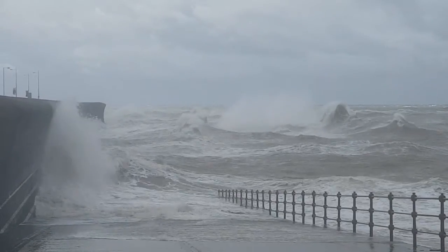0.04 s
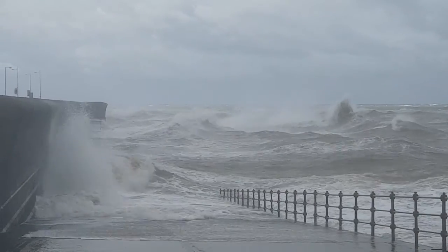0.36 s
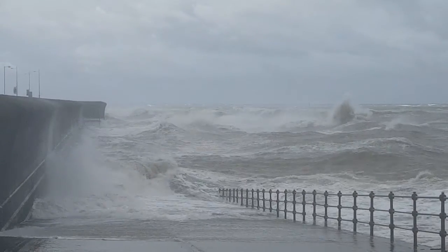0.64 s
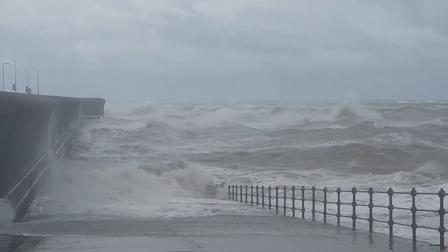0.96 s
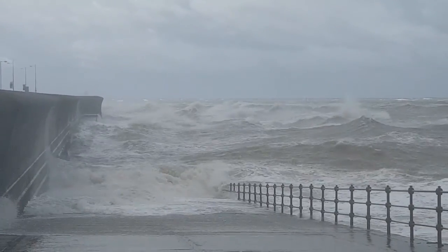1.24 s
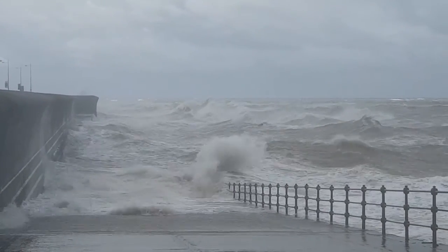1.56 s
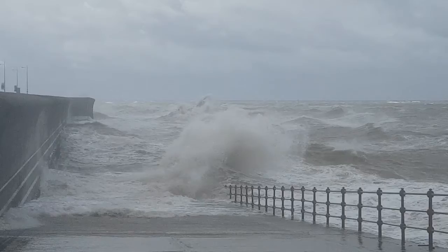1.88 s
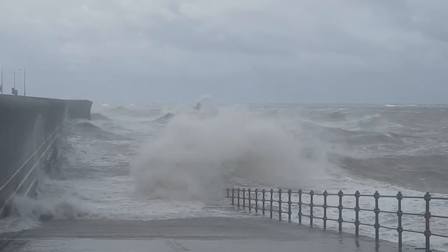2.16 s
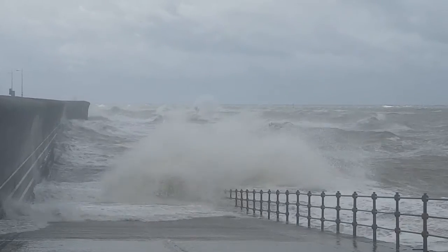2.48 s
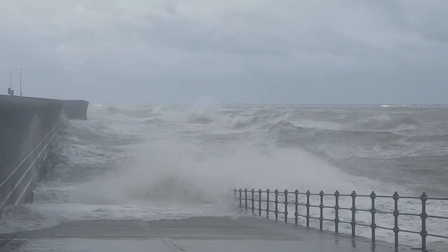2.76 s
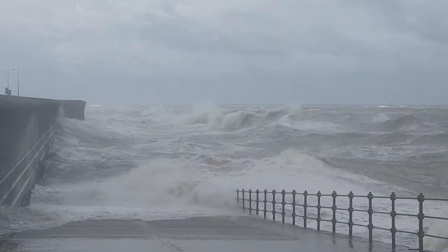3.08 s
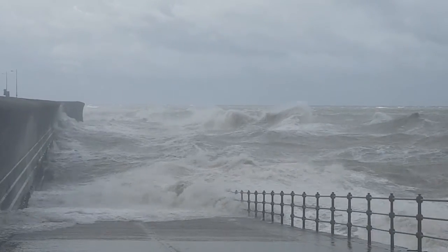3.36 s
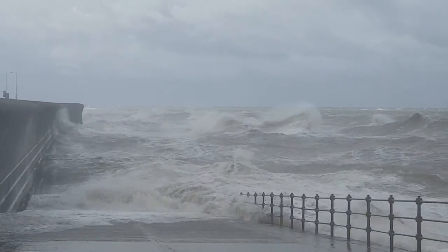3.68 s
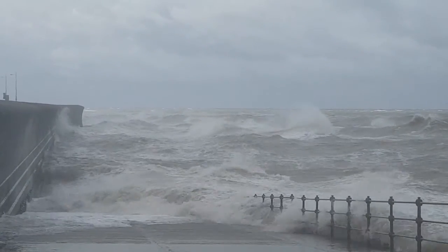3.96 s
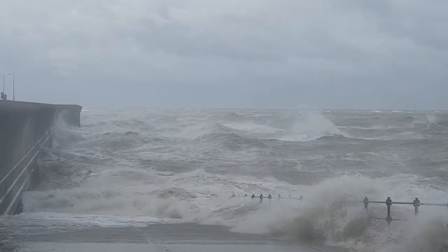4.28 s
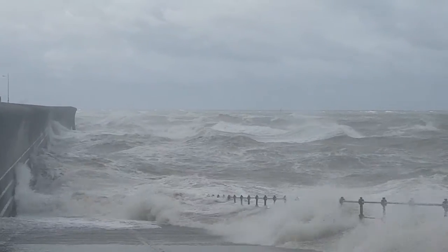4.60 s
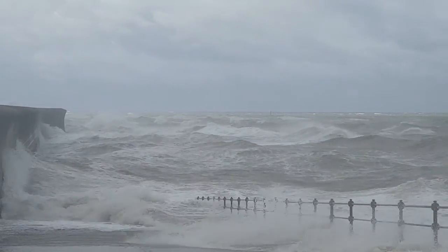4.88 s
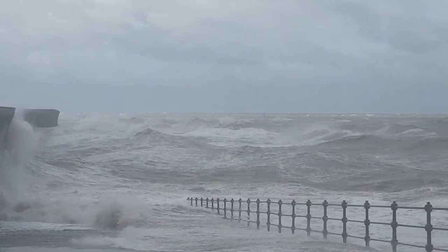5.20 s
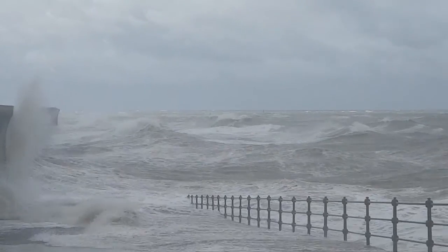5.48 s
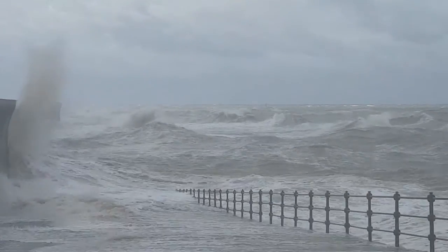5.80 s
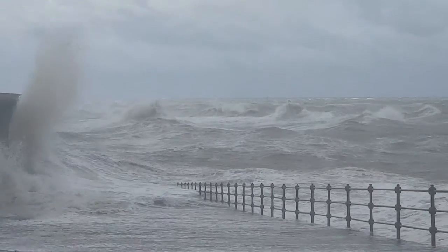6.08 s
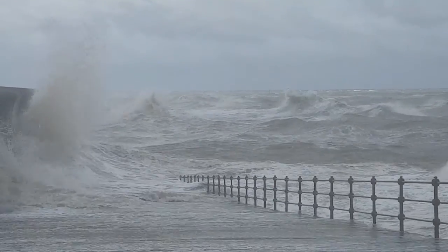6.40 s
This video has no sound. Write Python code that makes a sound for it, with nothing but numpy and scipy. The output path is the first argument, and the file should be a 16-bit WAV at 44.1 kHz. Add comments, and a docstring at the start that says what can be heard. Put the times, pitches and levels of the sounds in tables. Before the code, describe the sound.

Strong wind buffets a hand-held stereo microphone throughout, a low rumble with fluttering gusts that shift between the sides. Behind it, storm surf roars against a sea wall, fizzier on the left and slightly hollow on the right. From about 0.6 to 1.4 seconds the wind thumps several times on the left, while a small wave washes in near 1 second. The wind eases somewhat as a big wave crashes at 2 to 2.5 seconds, its spray hissing away through 3.5. Gusts hit again near 2.8 and 3.7 seconds over churning water. The surf swells from 4.5 seconds, with a bright slap of water toward the right at 4.8 and another toward the left at 5.5. Spray then hisses and patters on the promenade, mostly left, until about 6.4, with a few tiny close drop ticks. A hard, thumping gust arrives around 6.4 seconds.

```python
"""A gale rumbles and thumps on a hand-held stereo recorder; behind it, storm waves break on a sea wall.
Eddies on the microphone ports make the wind noise. Bubbles merge into the roar of the surf, masses
of water slap down, and spray hisses and patters on the promenade.
The exposed left microphone takes the sharp eddies and the fizz; the right one sits behind a narrow
port that booms in the wind and gives the surf a hollow ring."""
import sys
import numpy as np
from scipy import signal
from scipy.fft import rfft, irfft
from scipy.io import wavfile
from scipy.ndimage import uniform_filter1d

SR = 44100
rng = np.random.default_rng(int(sys.argv[2]) if len(sys.argv) > 2 else 0)


def generate_wav(signal):
    """Clip the signal to [-1, 1] and save it as 16-bit WAV at the path in sys.argv[1]."""
    frames = np.transpose(np.atleast_2d(signal))
    scaled = np.clip(frames, -1, 1) * 32767
    pcm = np.round(scaled).astype(np.int16)
    wavfile.write(sys.argv[1], SR, pcm)


N = 293265
TIME_S = np.arange(N) / SR
FREQ_HZ = np.maximum(np.arange(N // 2 + 1) * SR / N, 1)
LEFT, RIGHT = 1, -1

# spectrum of the finest eddies tearing on a port: f/Hz, level/dB
RASP = [(300, -11), (750, 0.5), (1400, -12.5), (2200, -22), (6000, -63)]


def undb(db):
    """Decibels to gain."""
    return 10 ** (np.asarray(db) / 20)


def response(points):
    """Gain per FFT bin from rows of f/Hz, level/dB."""
    hz, db = np.transpose(points)
    return undb(np.interp(np.log(FREQ_HZ), np.log(hz), db))


def colour(x, spectrum):
    """Filter x by a spectrum; rms 1."""
    y = irfft(rfft(x) * response(spectrum), N)
    return y / np.std(y)


def walk(rate_hz):
    """Smooth random motion; rms 1."""
    y = irfft(rfft(rng.standard_normal(N)) / (1 + (FREQ_HZ / rate_hz) ** 4), N)
    return y / np.std(y)


def even(x, span_samples):
    """Hold the running rms near 1; quicker flicker stays."""
    power = uniform_filter1d(x ** 2, span_samples)
    return x / np.sqrt(uniform_filter1d(power, span_samples) + 1e-12)


def droplets(per_s, spread_db):
    """Tiny random impacts, most weak, a few strong; rms 1."""
    hit = rng.random(N) < per_s / SR
    size = undb(spread_db * np.minimum(rng.exponential(size=N), 5))
    y = hit * size * rng.choice([-1, 1], N)
    return y / np.std(y)


def breakers():
    """Relative roar and hiss in dB: each wave builds, tumbles and drains over the steady open sea."""
    # waves: t at full strength/s, rise/s, hold/s, decay/s, roar/dB, hiss/dB
    waves = [(0.0, .1, 1.13, 0.024, -41, -52), (0.912, .15, 0.054, 0.11, -38, -44.5),
             (2.14, 0.28, 0.43, 0.76, -30.5, -37), (2.373, .1, 0.027, .08, -29.5, -47),
             (3.092, 0.8, 2.3, 0.39, -34, -46.5), (4.704, 0.5, 0.78, 0.23, -29, -43),
             (5.49, 0.39, 0.27, 0.24, -31, -34), (6.024, 0.12, 0.13, 0.19, -37.5, -33.5),
             (6.243, 0.16, 0.094, .04, -35.5, -40.5)]
    roar_power, hiss_power = undb(-39.5) ** 2, undb(-53.5) ** 2  # open sea
    for at_s, rise_s, hold_s, decay_s, roar_db, hiss_db in waves:
        age_s = TIME_S - at_s
        swell = np.exp(-np.maximum(-age_s, 0) / rise_s - np.maximum(age_s - hold_s, 0) / decay_s)
        roar_power += (swell * undb(roar_db)) ** 2
        hiss_power += (swell * undb(hiss_db)) ** 2
    return 10 * np.log10(roar_power), 10 * np.log10(hiss_power)


def surf(level_db, churn_db, bubble_db):
    """White water: countless bubbles merge into a churning roar, the larger ones stand out."""
    # roar: f/Hz, level/dB
    spectrum = [(100, -6), (400, -1), (900, 1), (2000, 0), (3500, -6.5), (6000, -8), (9000, -16.5),
                (15000, -22)]
    foam = rng.standard_normal(N) + undb(bubble_db) * droplets(per_s=1500, spread_db=7.5)
    return colour(foam, spectrum) * undb(level_db + churn_db * walk(rate_hz=18))


def slaps(side):
    """Falling masses of water land in bright crashes that die away."""
    # landings: t/s, level/dB, rise/s, decay/s, left minus right/dB
    landings = [(2.39, -32.5, 0.15, 0.44, 0), (4.84, -32.5, 0.045, 0.067, -9),
                (5.475, -31, 0.029, 0.074, 5.5), (5.73, -40, 0.034, .03, 13)]
    swell = np.zeros(N)
    for at_s, db, rise_s, decay_s, pan_db in landings:
        age_s = TIME_S - at_s
        swell += undb(db + side * pan_db / 2) * np.exp(-np.maximum(-age_s / rise_s, age_s / decay_s))
    crash = rng.standard_normal(N) + droplets(per_s=1300, spread_db=1.5)
    spectrum = [(700, -18), (2000, -1.5), (3300, 2.5), (6000, 0.5), (9000, 0), (15000, -27)]
    return swell * colour(crash, spectrum)


def spray(level_db, sheet_db, patter_db):
    """Thrown water falls back in sheets: mist hisses, drops patter on concrete."""
    # hiss: f/Hz, level/dB
    spectrum = [(1000, -36), (3000, -6.5), (5500, 3.5), (8000, 3), (12000, -4.5), (15500, -4)]
    fall = rng.standard_normal(N) + undb(patter_db) * droplets(per_s=3000, spread_db=1.5)
    return colour(fall, spectrum) * undb(level_db + sheet_db * walk(rate_hz=27))


def near_drops(gain_db, decay_s):
    """Each close drop bursts in a short bright tick."""
    # drops: t/s, relative level/dB
    drops = [(0.162, -35), (5.499, -19), (5.6002, -28), (5.984, -21), (6.5954, -35)]
    envelope = sum(undb(db + gain_db) * (TIME_S >= at_s) * np.exp(-np.abs(TIME_S - at_s) / decay_s)
                   for at_s, db in drops)
    return envelope * colour(rng.standard_normal(N), [(2000, -22), (6000, -2), (11000, 4), (15500, -6)])


def sea(side):
    """Water breaks all around: each side hears the same waves with independent noise."""
    roar_db, hiss_db = breakers()
    spray_pan_db = 4.5  # the wall throws its spray up on the left
    roar = surf(roar_db - 3, churn_db=1.5, bubble_db=-7.5)
    crashes = slaps(side)
    hiss = spray(hiss_db + 0.5 + side * spray_pan_db / 2, sheet_db=1.5, patter_db=-12.5)
    return roar + crashes + hiss


def microphone(x, side):
    """Airborne sound coloured by one microphone and its port."""
    # sensitivity: f/Hz, level/dB
    mic_left = [(100, 1), (1000, 1), (2000, -2), (4000, -1), (7000, -1), (13000, 1.5), (15500, -6)]
    mic_right = [(100, -1), (500, 9), (850, -7.5), (1400, -3.5), (2300, -1), (3000, -6.5), (4200, -11),
                 (7000, -18.5), (10000, -22.5), (15500, -19)]
    # port resonances and notches: f/Hz, width/Hz, level/dB
    port_left = [(2800, 1300, 3.5), (4820, 740, 2), (9300, 1700, -4), (11900, 1900, 3.5)]
    port_right = [(1867, 700, 6), (2188, 484, 12), (2970, 320, -6.5), (4790, 1300, 15), (5860, 400, -6),
                  (6330, 910, 4), (12500, 1800, 12)]
    sensitivity, port = (mic_left, port_left) if side == LEFT else (mic_right, port_right)
    port_db = sum(db / (1 + (2 * (FREQ_HZ - hz) / width_hz) ** 2) for hz, width_hz, db in port)
    return irfft(rfft(x) * response(sensitivity) * undb(port_db), N)


def gusts(side):
    """Extra rumble and flutter in dB: bell-shaped gusts, strongest on the microphone facing them."""
    # gusts and lulls: t/s, half-width/s, rumble/dB, flutter/dB, pan (0 right, 1 left)
    passes = [(0.207, 0.032, 4, 1.5, 0.7), (0.595, 0.064, 4.5, 7.5, 0.68), (0.988, .06, 1.5, 1.5, 0),
              (1.05, 0.11, -3.5, -1.5, 1), (1.348, .025, -1, 1.5, 1), (1.853, 0.081, 3.5, 9.5, 0),
              (1.95, 0.023, -6, 0, 0.1), (2.092, 0.027, 3, 8.5, 0), (2.21, 0.051, 3.5, -5, .25),
              (2.353, 0.066, -4, 2.5, 0.2), (2.523, 0.065, 5.5, 0, .7), (2.707, 0.077, 5, 4, 0.63),
              (3.052, 0.03, 2, 5.5, 1), (3.19, 0.054, 2, 3, 0.6), (3.512, .13, 4.5, 0, 0.15),
              (3.73, 0.046, 13.5, 2, 0.99), (4.05, 0.058, 4.5, 3, 0.84), (4.638, 0.13, -0.5, 10, 0),
              (4.96, 0.072, 3.5, 9.5, 0.02), (5.175, 0.016, 7, 11, 1), (5.29, 0.034, 9, 6, 1),
              (5.43, 0.021, 5, -6.5, 0.76), (5.582, 0.024, 6, 6, 1), (6.177, 0.081, 2.5, 1, 0)]
    extra_rumble_db, extra_flutter_db = np.zeros(N), np.zeros(N)
    for at_s, width_s, rumble_db, flutter_db, pan in passes:
        facing = np.clip(1 + side * (2 * pan - 1), 0, 1)
        swell = facing * np.exp(-((TIME_S - at_s) / width_s) ** 2)
        extra_rumble_db += rumble_db * swell
        extra_flutter_db += flutter_db * swell
    return extra_rumble_db, extra_flutter_db


def eddies(side, growth, wander_db, wander_hz):
    """Eddy levels in dB follow gale and gusts and wander by chance; pairs are (large, small)."""
    # force of the gale: t/s, level re usual strength/dB
    force = [(0.0, -0.2), (0.66, 3), (1.21, 2.7), (1.41, -1.8), (1.49, -6), (1.7, -3), (1.88, -7),
             (2.45, -7), (2.82, 0), (2.89, -11.5), (3.05, -1.9), (3.69, -5.5), (3.88, 3), (4.34, -6.5),
             (4.5, -2.5), (6.3, -0.5), (6.39, 6), (6.65, 0.3)]
    force_db = np.interp(TIME_S, *np.transpose(force))
    return [slope * force_db + gust_db + spread_db * walk(wander_hz)
            for slope, gust_db, spread_db in zip(growth, gusts(side), wander_db)]


def buffets(cycles, rasp_gain_db, rasp_s):
    """A passing eddy swings the pressure down and up once and rasps as it breaks on the port."""
    # single eddies: t/s, level/dB, f/Hz, relative rasp/dB
    thumps = [(0.609, -2.5, 170, -21), (0.731, -6, 497, -6.5), (0.852, -6, 594, -18),
              (1.093, -10, 500, -21), (1.167, -8, 450, -14), (1.354, 1, 230, -9.5), (2.505, -12, 140, -23),
              (2.804, 1.5, 275, -13), (3.328, -6.5, 228, -36), (3.866, -9, 450, -20),
              (5.939, -10, 238, -16), (6.368, -5, 400, -11.5), (6.397, 3, 220, -10), (6.477, -6, 273, -7)]
    out, rasp = np.zeros(N), colour(rng.standard_normal(N), RASP)
    for at_s, db, hz, rasp_db in thumps:
        near = np.abs(TIME_S - at_s) < 0.05
        age_s = TIME_S[near] - at_s
        swing = np.sin(2 * np.pi * age_s * hz + rng.uniform(0, 2 * np.pi))
        out[near] += undb(db) * np.exp(-(age_s * hz / cycles) ** 2) * swing
        out[near] += undb(rasp_db + rasp_gain_db) * np.exp(-(age_s / rasp_s) ** 2) * rasp[near]
    return out


def wind(eddy_db, rumble_spectrum, flutter_spectrum, rumble_db, flutter_db, burst_db, burst_hz, tear_db):
    """Turbulence on one port: large eddies rumble, small ones flutter in bursts."""
    large_db, small_db = eddy_db
    rumble = even(colour(rng.standard_normal(N), rumble_spectrum), span_samples=1800)
    bursts = undb(burst_db * walk(burst_hz))
    flutter = even(colour(rng.standard_normal(N) * bursts, flutter_spectrum), span_samples=1300)
    # the finest eddies tear hardest at the burst peaks
    tear = even(colour(rng.standard_normal(N) * bursts ** 2, RASP), span_samples=1300)
    flutter += undb(tear_db) * tear
    return rumble * undb(large_db + rumble_db) + flutter * undb(small_db + flutter_db)


def gale():
    """Wind noise arises on each port separately; single eddies thump the exposed left one."""
    # large-eddy spectra: f/Hz, level/dB
    rumble_left = [(15, -23), (40, -7), (70, 4), (105, 0.5), (170, -3), (280, -8.5), (500, -25.5),
                   (1200, -63)]
    rumble_right = [(15, -13), (40, -17), (70, -7.5), (110, -.5), (150, 1), (200, -4), (290, -16.5),
                    (500, -26.5), (1200, -92)]
    # small-eddy spectra: f/Hz, level/dB
    flutter_left = [(80, -50), (200, -6), (350, -0.5), (550, -4), (850, -13), (1300, -19.5), (2200, -33),
                    (5000, -78)]
    flutter_right = [(100, -17.5), (220, 2.5), (320, -0.5), (480, -9.5), (650, -18.5), (900, -31.5),
                     (1500, -35), (4000, -85)]
    exposed_db = eddies(LEFT, growth=(0.54, 1.22), wander_db=(0.85, 2.1), wander_hz=15)
    sheltered_db = eddies(RIGHT, growth=(0.41, 1.34), wander_db=(0.87, 2.35), wander_hz=13.6)
    thumps = buffets(cycles=0.48, rasp_gain_db=-10, rasp_s=0.0043)
    left = wind(exposed_db, rumble_left, flutter_left, rumble_db=-19.5, flutter_db=-26.5,
                burst_db=1.5, burst_hz=45, tear_db=-14)
    right = wind(sheltered_db, rumble_right, flutter_right, rumble_db=-11, flutter_db=-19.5,
                 burst_db=3, burst_hz=39.6, tear_db=-35)
    return np.array([left + thumps, right])


def scene():
    """Sea and close drops through both microphones, under the gale."""
    drops = near_drops(gain_db=-2.5, decay_s=0.0018)
    water = np.array([microphone(sea(side) + drops, side) for side in (LEFT, RIGHT)])
    return water + gale()


def record(dry):
    """The recorder rounds the strongest wind peaks and cuts the top."""
    top_hz = 15600
    rounded = dry / (1 + dry ** 12) ** (1 / 12)
    lowpass = signal.ellip(10, 0.05, 50, top_hz, fs=SR, output="sos")
    return signal.sosfiltfilt(lowpass, rounded)


dry = scene()
out = record(dry)
generate_wav(out)
```